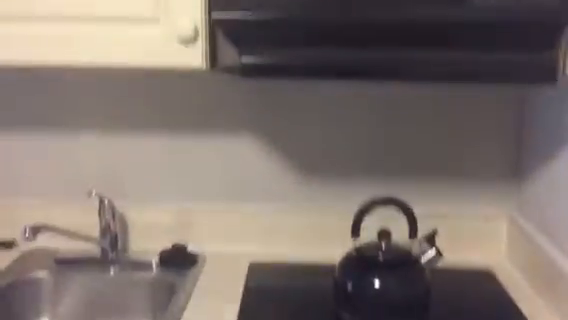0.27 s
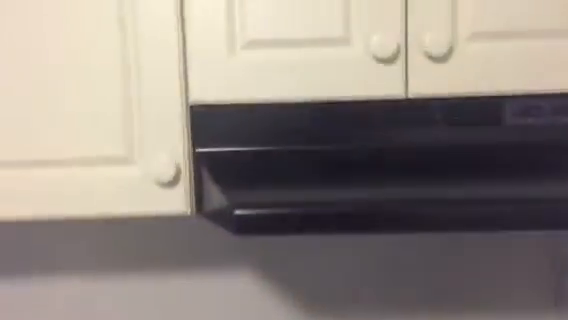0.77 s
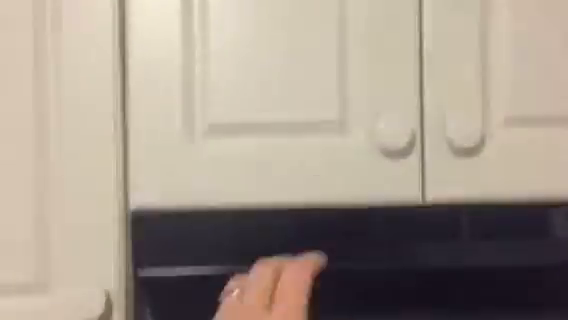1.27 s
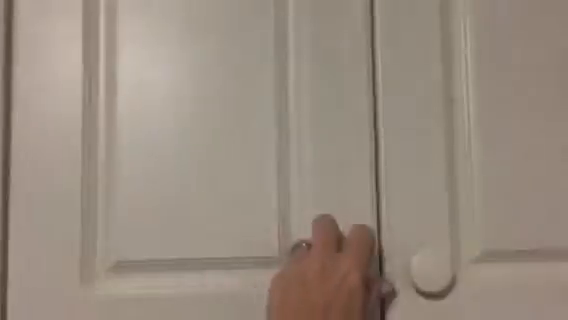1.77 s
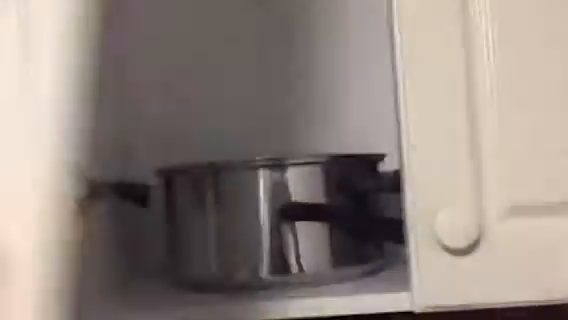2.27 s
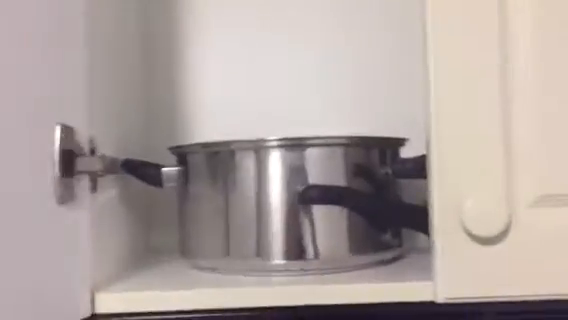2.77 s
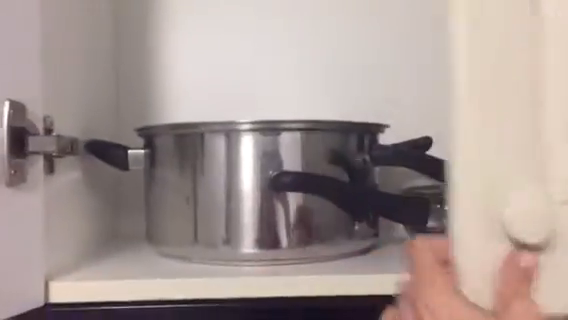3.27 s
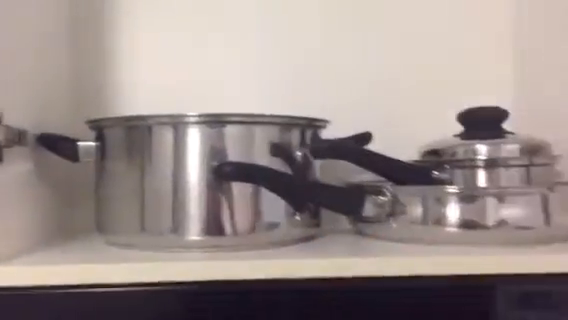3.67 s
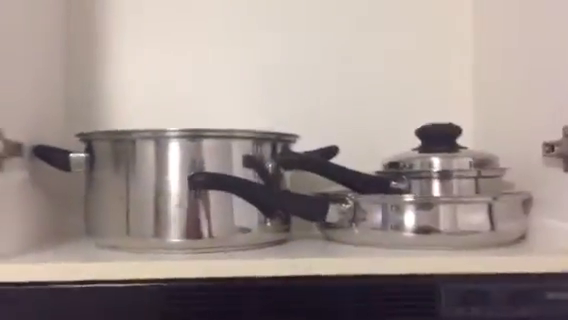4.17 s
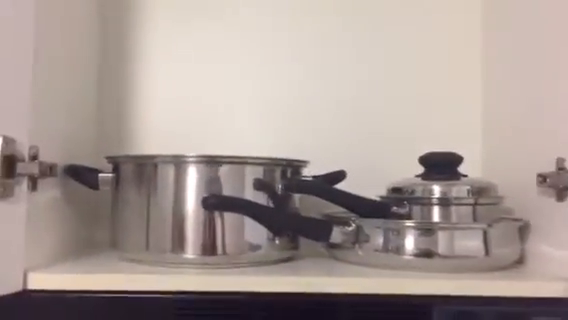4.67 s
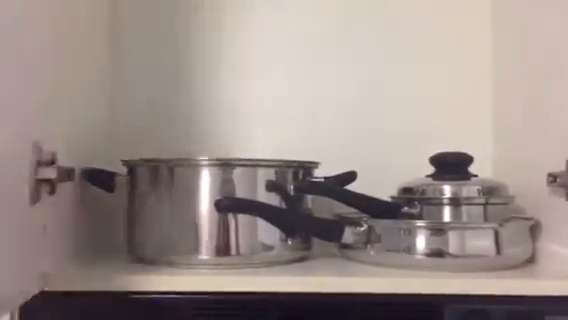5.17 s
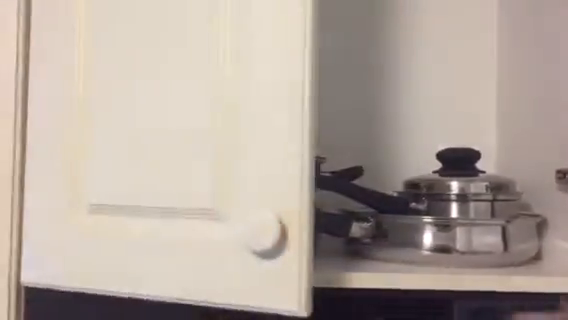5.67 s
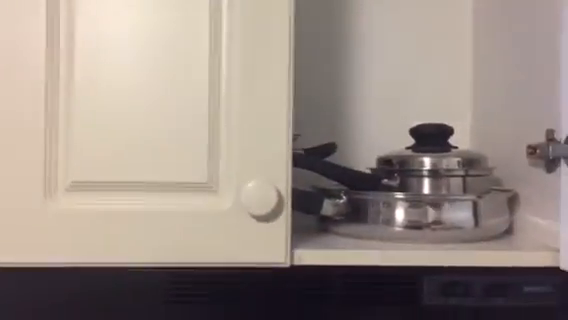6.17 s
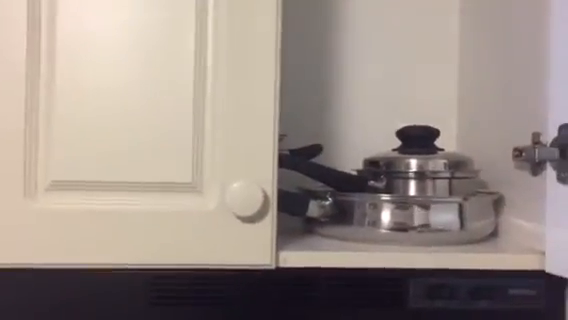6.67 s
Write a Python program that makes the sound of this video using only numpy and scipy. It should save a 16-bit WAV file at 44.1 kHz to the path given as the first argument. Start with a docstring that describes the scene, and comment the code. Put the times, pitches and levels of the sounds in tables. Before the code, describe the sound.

Dull knocks, then wooden cabinet doors are pulled open with clicks and one bangs shut, over a low kitchen hum.

```python
"""A small kitchen, close to a hand-held phone: dull footstep-like knocks, then two wooden cabinet doors are
pulled open and one is pushed shut. Impacts and stick-slip friction excite damped modes of the wood, and the
door panels pump the air in the cabinet. The slam bounces once and sets steel pots ringing. A fridge
compressor and a fan hum at harmonics of their shaft rates, over a low rumble, a faint rustle and hiss."""
import sys
import numpy as np
from scipy import signal
from scipy.fft import rfft, irfft, next_fast_len
from scipy.io import wavfile
from scipy.ndimage import uniform_filter1d

SR = 44100
rng = np.random.default_rng(int(sys.argv[2]) if len(sys.argv) > 2 else 0)


def wrap_up_sound(samples):
    """Save the sound to the file named by the first command line argument, as 16-bit audio."""
    columns = np.atleast_2d(samples).T
    # keep every value between -1 and 1, then stretch to whole-number steps
    tamed = np.clip(columns, -1, 1)
    steps = np.round(tamed * 32767).astype(np.int16)
    wavfile.write(sys.argv[1], SR, steps)


N = 304731

# normal modes of the woodwork: pitch_hz, level_db, t60_s
WOOD_MODES = [(243, -10.5, .12), (305, 5.5, 0.05), (345.2, 13, 0.17), (502.6, 11, 0.03), (649, -4.5, .1),
              (712.5, 4.5, .08), (768, 4, 0.034), (964, 3.5, 0.051), (1041, 1.5, 0.11), (1304, 3.5, 0.021),
              (1490, 0.5, .06), (2027, -3.5, 0.027), (2100, -3, .06), (2590, -7.5, 0.07),
              (3460, -19.5, .07), (4220, -29, .04)]
# the door meets the frame, bounces and lands again: start_s, strength_db, rise_ms, pitch_ratio, pots_db
SLAMS = [(6.055, -3.14, 0.61, 1.01, -56), (6.254, -9, 6.7, 1.047, -45)]


def undb(db):
    """Amplitude ratio of a level in decibels."""
    return 10 ** (np.asarray(db) / 20)


def add(track, start_s, sound):
    """Superposition: sums a sound into the track from start_s on."""
    i = int(start_s * SR)
    track[i:i + len(sound)] += sound[:N - i]


def band(x, hz, octaves):
    """Butterworth band-pass, centred on hz on a logarithmic scale."""
    edge = 2 ** (max(octaves, .1) / 2)
    edges_hz = [hz / edge, min(hz * edge, .45 * SR)]
    return signal.sosfilt(signal.butter(2, edges_hz, "band", fs=SR, output="sos"), x)


def ring(x, modes):
    """Modal response: each mode is a damped resonator that a unit impulse rings at its level."""
    response = 0
    for hz, db, t60_s in modes:
        radius = np.exp(-np.log(1000) / (t60_s * SR))
        angle = 2 * np.pi * hz / SR
        feedback = [1, -2 * radius * np.cos(angle), radius * radius]
        response = response + undb(db) * signal.lfilter([0, np.sin(angle)], feedback, x)
    return response


def peak(x, db):
    """Peak normalisation: scales the largest excursion to db."""
    return x * undb(db) / np.max(np.abs(x))


def wander(rate_hz):
    """Low-pass noise for slow modulation, with a spread near 1 and limited to 2."""
    hold = int(SR / rate_hz)
    steps = np.repeat(rng.standard_normal(N // hold + 1), hold)
    return np.clip(1.3 * uniform_filter1d(uniform_filter1d(steps, hold), hold)[:N], -2, 2)


def shaft_tones(shaft_hz, harmonics):
    """Periodic rotation radiates harmonics of the shaft rate, each wavering slightly in level."""
    t = np.arange(N) / SR
    return sum(np.sqrt(2) * undb(db + 0.16 * wander(1))
               * np.sin(2 * np.pi * (order * shaft_hz * t + rng.random())) for order, db in harmonics)


def fridge_and_fan():
    """Beating: the two shaft tones, close in frequency, interfere about six times a second."""
    fridge_hz, fan_hz = 58.2, 52
    # harmonics of each machine: order, level_db
    fridge_harmonics = [(1, -1.5), (2, -27.5), (4, -21), (5, -26), (11, -41)]
    fan_harmonics = [(4, -8.5), (5, -25.5), (6, -29), (8, -22.5), (12, -27)]
    # the phone moves through the standing waves of the room: time_s, fridge_db, fan_third_db
    standing_waves = [(0, -47.5, -72), (.6, -48.5, -66.5), (1.5, -49, -60.5), (2.2, -45.5, -52.5),
                      (3.002, -46.5, -54), (3.7, -46, -55), (4.3, -42.5, -53), (4.999, -45, -49.5),
                      (5.899, -42.5, -47.5), (6.5, -43, -56), (6.91, -44.5, -64)]
    time_s, fridge_db, fan_third_db = np.transpose(standing_waves)
    t = np.arange(N) / SR
    fan = undb(np.interp(t, time_s, fan_third_db)) * shaft_tones(fan_hz, [(3, 0)])
    fan += undb(-53.5) * shaft_tones(fan_hz, fan_harmonics)
    fan += shaft_tones(fan_hz, [(1, -54.5)])
    return fan + undb(np.interp(t, time_s, fridge_db)) * shaft_tones(fridge_hz, fridge_harmonics)


def noise_floor():
    """Spectrally shaped Gaussian noise: room rumble and microphone hiss."""
    # relative spectral density: frequency_hz, level_db
    spectrum = [(20, -1.5), (40, -19), (75, -12), (110, -21.5), (170, -19), (230, -28), (330, -26),
                (500, -32.5), (800, -35), (1500, -45.5), (4000, -43), (8000, -48.5), (16000, -54.5)]
    hz, db = np.transpose(spectrum)
    size = next_fast_len(N)
    bins_hz = np.arange(1, size // 2 + 2) * SR / size
    gain = undb(np.interp(np.log(bins_hz), np.log(hz), db))
    noise = irfft(rfft(rng.standard_normal(size)) * gain, size)[:N]
    return undb(-56.5) * noise / noise.std()


def rumble_and_rustle():
    """Amplitude modulation of two noise bands gives an uneven low rumble and a faint rustle."""
    # slow level contours: time_s, rumble_db, rustle_db
    contours = [(0, -65, -71), (.6, -64, -71.5), (1.7, -65, -75), (2.2, -49, -77.5), (2.699, -51, -71.5),
                (3, -60.5, -78.5), (3.7, -60, -65.5), (4.1, -61.5, -77), (5.2, -56.5, -77.5),
                (6.002, -56, -79), (6.91, -51.5, -79.5)]
    time_s, rumble_db, rustle_db = np.transpose(contours)
    t = np.arange(N) / SR
    rumble = band(band(rng.standard_normal(N), 100, 1.2), 100, 1.6)
    rustle = band(rng.laplace(size=N), 800, 2.83)
    rumble *= undb(np.interp(t, time_s, rumble_db) + 4.5 * wander(8)) / rumble.std()
    rustle *= undb(np.interp(t, time_s, rustle_db) + 2.5 * wander(12)) / rustle.std()
    return rumble + rustle


def impact(db, hz, octaves, rise_ms, t60_ms, on_wood):
    """Impact excitation: a decaying rattle of contacts with a bright tick; on wood it rings the modes."""
    ms = 1000 * np.arange(SR // 3) / SR
    envelope = np.minimum(ms / rise_ms, 1) * np.exp(-np.log(1000) * ms / t60_ms)
    contacts = rng.laplace(size=len(ms)) * envelope
    force = band(band(contacts, hz, octaves), hz, octaves + 1)
    body = peak(force, 0)
    if on_wood:
        body += peak(ring(force, WOOD_MODES), -12)
    tick_db = max(-14.5 * np.log2(7000 / hz) / octaves, -43)  # weaker the further below 7 kHz
    return peak(body, db) + peak(band(contacts, 6500, 1.45), db + tick_db)


def knocks_and_slams():
    """Impacts in the room arrive direct and reverberant; knocks on the phone are structure-borne."""
    # fingers on the phone: start_s, level_db, centre_hz, width_octaves, rise_ms, t60_ms
    phone_knocks = [(.262, -28, 770, 2.17, 3.3, 16.7), (.953, -50, 1980, 2.9, .4, 8.4)]
    # dull footstep-like knocks in the room, then taps and ticks on the cabinet and hinges: same columns
    knocks = [(.449, -19, 748, 1.37, 2.9, 40), (.452, -26.5, 405, 1.4, 4, 76),
              (.612, -30, 1460, 2.3, 0.59, 32), (1.305, -21.5, 1500, 1.43, 1, 30),
              (1.308, -30, 288, 0.94, 3.1, 47), (1.313, -17, 916, 1.24, 12, 20.3),
              (1.383, -32, 2600, 1.48, 0.88, 53), (1.726, -27.5, 1970, 1.76, 4, 104),
              (1.808, -21, 2120, 1.39, 0.36, 30), (1.839, -44, 2380, 5.4, 4.6, 17),
              (2.02, -43.5, 900, 1.3, 5.1, 190), (2.057, -25.5, 2290, 2.26, 0.97, 10.6),
              (2.061, -28.5, 315, 1.34, 1.4, 50), (2.065, -29, 660, 0.59, 27, 85),
              (2.363, -48, 1910, .8, 1, 61), (2.394, -32, 740, 2.62, 5.2, 24),
              (2.485, -44, 1760, 1.95, 3.5, 39), (3.102, -38, 1200, 1.8, 10.6, 92),
              (3.239, -54, 2500, 3, 1.5, 15), (3.32, -54.5, 3450, 2.4, 1.6, 51),
              (3.368, -44.5, 1710, 1.3, 0.6, 48), (3.555, -49, 1490, 2.2, 9.4, 59),
              (3.634, -37, 680, 3.2, 11.5, 43), (3.699, -40.5, 1950, 1.4, 3, 38),
              (3.73, -35, 1560, 1.7, 9.4, 36), (3.774, -43, 880, 0.89, 13, 27),
              (4.292, -40, 1930, 2.3, 1.1, 180), (4.423, -36, 710, 0.57, 3.1, 80),
              (5.026, -46, 564, 1.24, 5.9, 79), (5.242, -41, 1500, 2.6, 2.2, 25),
              (5.45, -53, 2340, 1.1, 1.5, 270), (5.625, -52.5, 1500, 2.2, 3.7, 42),
              (6.034, -36.5, 2130, 1.55, 2.5, 360), (6.692, -36.5, 2490, 2.7, 13, 33),
              (6.69, -38.5, 573, 0.84, 15, 92), (6.748, -46, 1480, 2.9, 4.4, 24),
              (6.79, -43.5, 416, 0.4, 20, 29)]
    # parts that rattle in a slam: delay_ms, level_db, centre_hz, width_octaves, t60_ms
    rattles = [(0.72, 4.5, 1860, 1.61, 75), (.6, -10, 14000, 3.65, 110), (2.2, -9, 340, .9, 140),
               (8.5, -4, 850, 0.73, 90)]
    cracks = []
    for start_s, db, rise_ms, _, _ in SLAMS:
        for delay_ms, part_db, hz, octaves, t60_ms in rattles:
            dulling_db = 0.42 * rise_ms * max(np.log2(hz / 1000), 0)  # a slower crack has less treble
            cracks.append((start_s + delay_ms / 1000, db + part_db - dulling_db,
                           hz, octaves, rise_ms + delay_ms / 2, t60_ms))
    direct, to_room = np.zeros(N), np.zeros(N)
    for blows, room_db in ((knocks, -3), (cracks, -4)):
        for start_s, *blow in blows:
            sound = impact(*blow, on_wood=True)
            add(direct, start_s, sound)
            add(to_room, start_s, undb(room_db) * sound)
    for start_s, *blow in phone_knocks:
        add(direct, start_s, impact(*blow, on_wood=False))
    return direct + reverberation(to_room)


def low_thumps():
    """Forced vibration lasts as long as each push; then the cabinet modes ring on weakly in free decay."""
    # one thump from a finger on the phone, the rest from door panels: start_s, level_db, pitch_hz, push_ms
    thumps = [(0.264, -27, 141, 7.4), (1.822, -37.5, 103, 42), (1.869, -34, 96.5, 42),
              (2.06, -15.5, 97, 33), (2.1, -28, 123.4, 160), (2.393, -38, 111, 20), (2.439, -45, 110, 17),
              (2.554, -38.5, 148, 54), (2.818, -37.5, 83, 63), (3.253, -40.5, 132, 27),
              (5.041, -29, 131.5, 23), (5.391, -39, 108, 37), (5.451, -37, 110.5, 17),
              (6.141, -23.5, 115, 66), (6.698, -36.5, 92.6, 69), (6.803, -46.5, 71.5, 44),
              (6.805, -41, 159.4, 48)]
    # panel swings in a slam: delay_ms, level_db, pitch_hz, push_ms, skew (under 1 the swing peaks early)
    slam_swings = [(.3, -9.5, 209.7, 48, 0.16), (3, -3.5, 86, 33, 1), (10, -7, 145, 34, 2.1)]
    # modes of the cabinet box: pitch_hz, level_db, t60_s
    box_modes = [(96, -9, 0.37), (105, -15.5, 0.21), (115.8, -15.5, 0.13), (157, -9, 0.15), (190, -15, .2),
                 (246, -6.5, 0.43)]
    swings = [(*thump, 0.23) for thump in thumps]  # skewed to peak early
    for start_s, db, rise_ms, pitch_ratio, _ in SLAMS:
        for delay_ms, part_db, hz, push_ms, skew in slam_swings:
            lag_s = (delay_ms + 0.7 * rise_ms) / 1000  # a slower crack sets the panel off later
            swings.append((start_s + lag_s, db + part_db, pitch_ratio * hz, push_ms, skew))
    forced = np.zeros(N)
    for start_s, db, hz, push_ms, skew in swings:
        t = np.arange(int(push_ms * SR / 1000)) / SR
        envelope = np.abs(np.sin(np.pi * (t / t[-1]) ** skew)) ** .6
        add(forced, start_s, undb(db) * envelope * np.sin(2 * np.pi * hz * t))
    return forced + undb(-58.5) * ring(forced, box_modes)


def reverberation(x):
    """Diffuse field: each band decays exponentially at its own rate, the rest of the home more slowly."""
    # reverberation times of the kitchen: centre_hz, t60_s
    decay_times = [(150, 0.54), (500, 0.39), (1500, 0.3), (4000, 0.29), (10000, .22)]
    home_t60_s, home_db = 1, -23.5
    t = np.arange(SR * 2 // 3) / SR
    tail = sum(np.exp(-np.log(1000) * t / t60_s) * band(rng.standard_normal(len(t)), hz, 1.73)
               for hz, t60_s in decay_times)
    home = band(rng.standard_normal(len(t)), 920, 3.8)
    tail += undb(home_db) * np.exp(-np.log(1000) * t / home_t60_s) * home
    tail *= np.minimum(t / 0.0051, 1)
    return signal.fftconvolve(x, tail / np.sqrt(np.sum(tail ** 2)))[:N]


def friction():
    """Stick-slip friction: uneven impulses partly ring the wood as each movement swells and fades."""
    # hinges and fingers rubbing: start_s, swell_s, fade_s, level_db, centre_hz, width_octaves
    rubs = [(1.72, 0.0094, 0.047, -38, 3380, 1.4), (1.8, 0.068, 0.038, -53.5, 3050, 7.2),
            (2.4, 0.059, 0.29, -67, 1460, 1.7), (3.088, 0.013, 0.037, -53, 9000, 2.6),
            (2.64, 0.041, 0.057, -69.5, 11200, 1.7), (2.72, 0.092, 0.03, -61.5, 1090, 0.69),
            (3.52, 0.051, 0.083, -66, 11000, 1.7), (3.56, 0.11, .2, -50.5, 910, 2.1),
            (3.869, 0.033, 0.042, -66, 9200, 3.4), (5.3, .12, 0.37, -64, 1870, 3.9)]
    slips_per_s, edge_db = 87, -23
    slipping = rng.random(N) < slips_per_s / SR
    slips = slipping * undb(2.1 * rng.exponential(size=N)) * rng.choice([-1, 1], N)
    direct = np.zeros(N)
    for start_s, swell_s, fade_s, db, hz, octaves in rubs:
        span = np.arange(int(start_s * SR), int((start_s + swell_s + fade_s) * SR))
        scratch = band(slips[span], hz, octaves)
        sound = scratch + undb(-26) * ring(scratch, WOOD_MODES)
        shape_db = np.interp(span / SR - start_s, [0, swell_s, swell_s + fade_s], [edge_db, 0, edge_db])
        add(direct, start_s, undb(db + shape_db) * sound / (sound.std() + 1e-9))
    return direct / 2 + reverberation(direct)


def pots():
    """Free vibration: lightly damped steel rings long after each landing of the door."""
    # modes of the pots: pitch_hz, level_db, t60_s
    steel_modes = [(1285, -4, 1.1), (1714, -8, 2.2), (1950, -4, .9), (2153, -8, 1.5), (2487, -6, 1.4),
                   (2640, -7, .8), (2880, -11, 1.3), (3190, -7, .5)]
    blows = np.zeros(N)
    for start_s, *_, pots_db in SLAMS:
        blows[int(start_s * SR)] = undb(pots_db)
    return ring(blows, steel_modes)


def scene():
    """Superposition of all sources at the phone, in one channel."""
    events = knocks_and_slams() + low_thumps() + friction() + pots()
    return (events + fridge_and_fan() + noise_floor() + rumble_and_rustle())[None]


def record(dry):
    """Band limiting and saturation: the phone drops deep bass and top treble and flattens the slam."""
    low_hz, top_hz, clip_level = 48, 15800, 0.74
    heard = signal.sosfilt(signal.butter(3, low_hz, "high", fs=SR, output="sos"), dry)
    clipped = heard / (1 + np.abs(heard / clip_level) ** 6) ** (1 / 6)
    return signal.sosfilt(signal.ellip(10, .2, 70, top_hz, fs=SR, output="sos"), clipped)


dry = scene()
out = record(dry)
wrap_up_sound(out)
```